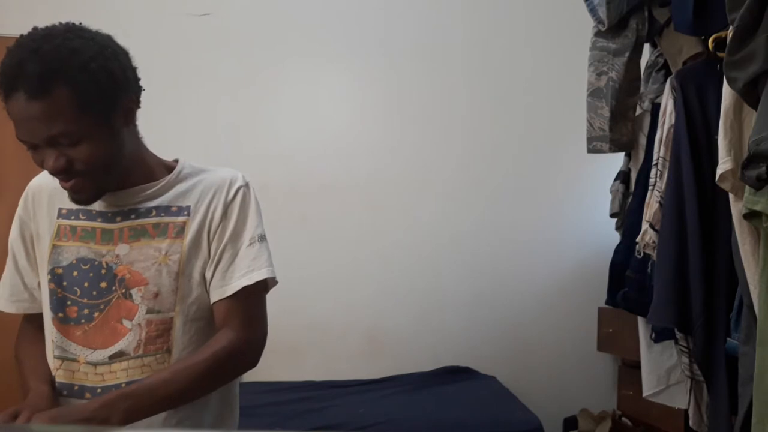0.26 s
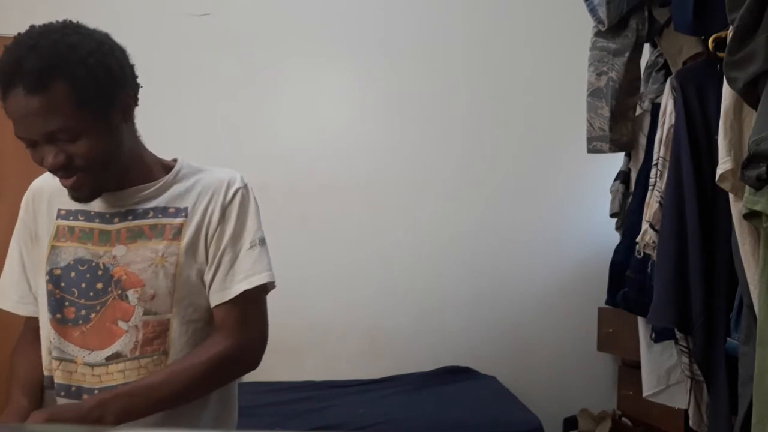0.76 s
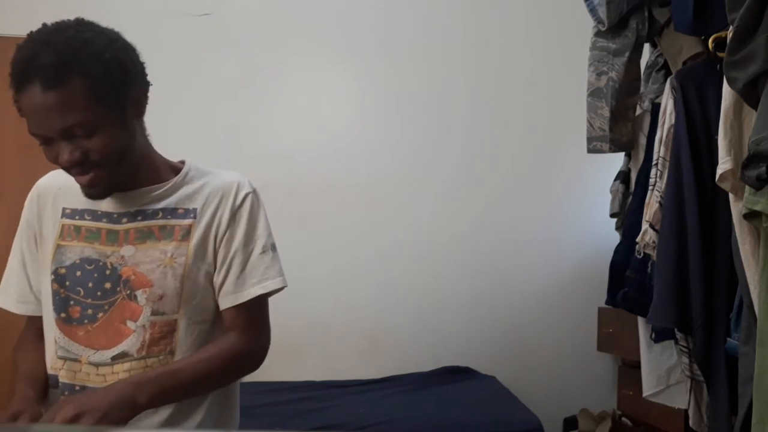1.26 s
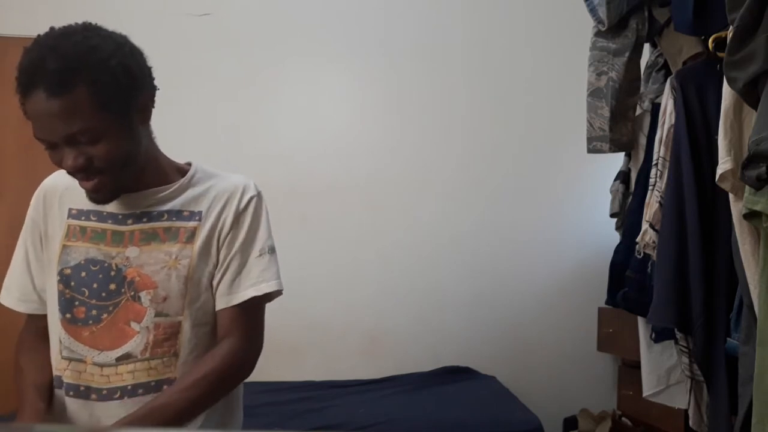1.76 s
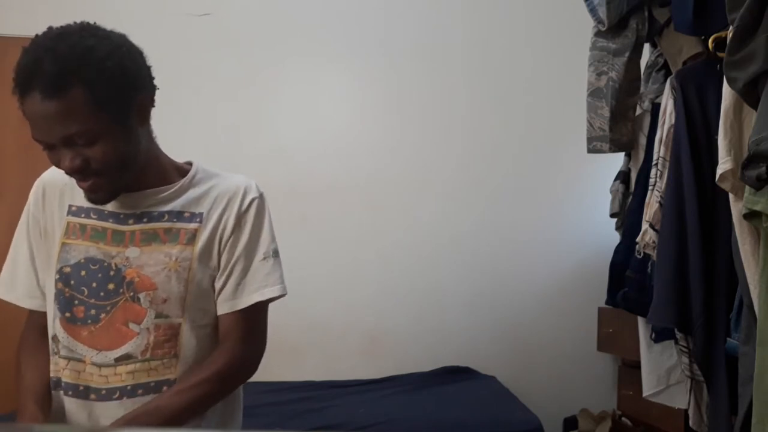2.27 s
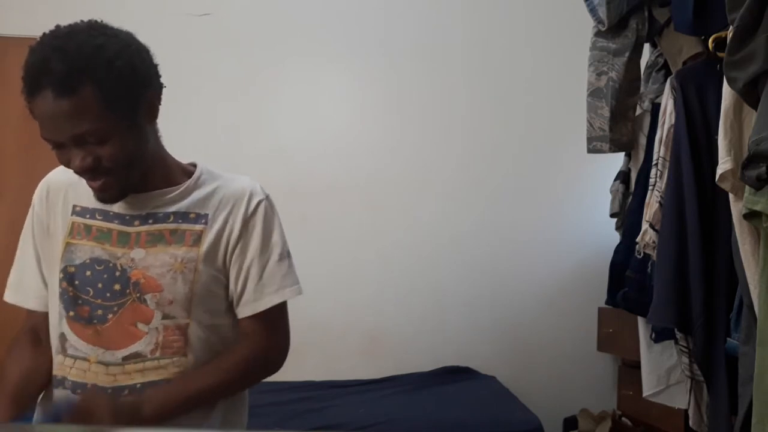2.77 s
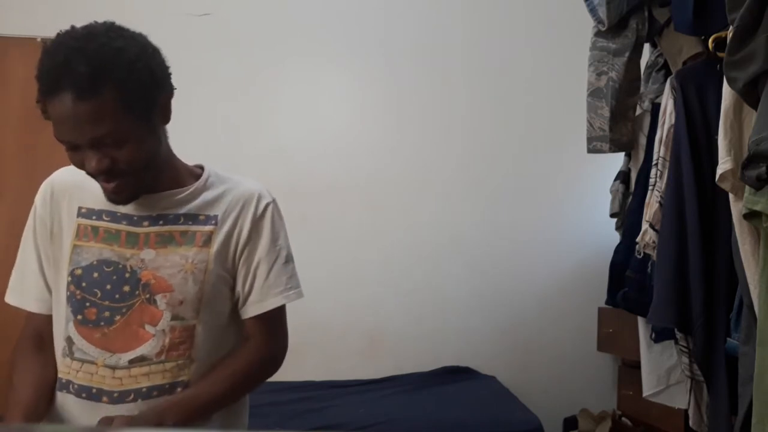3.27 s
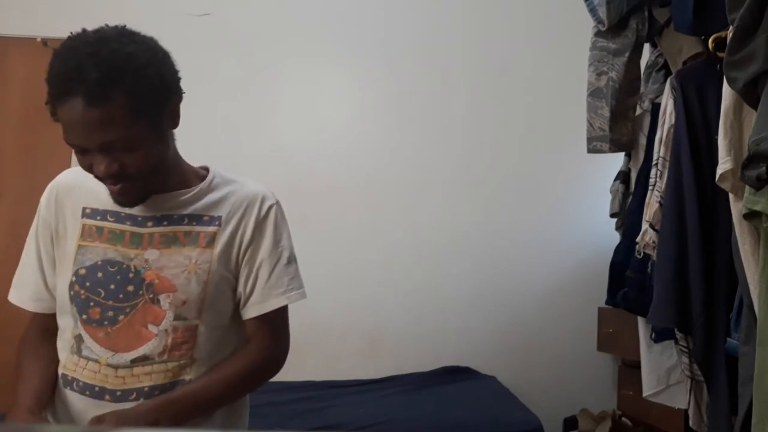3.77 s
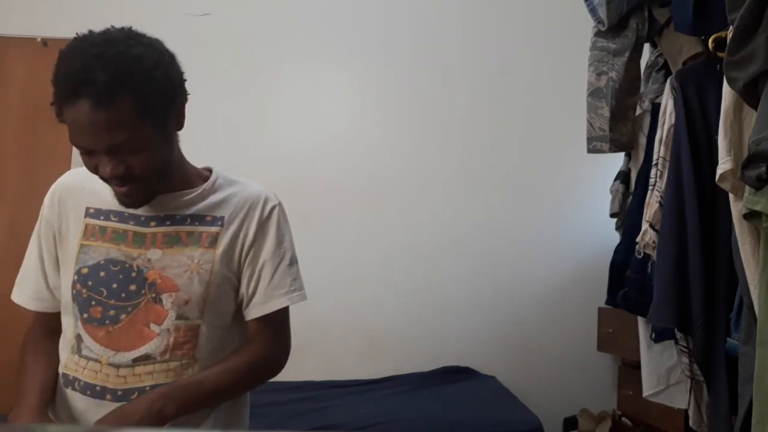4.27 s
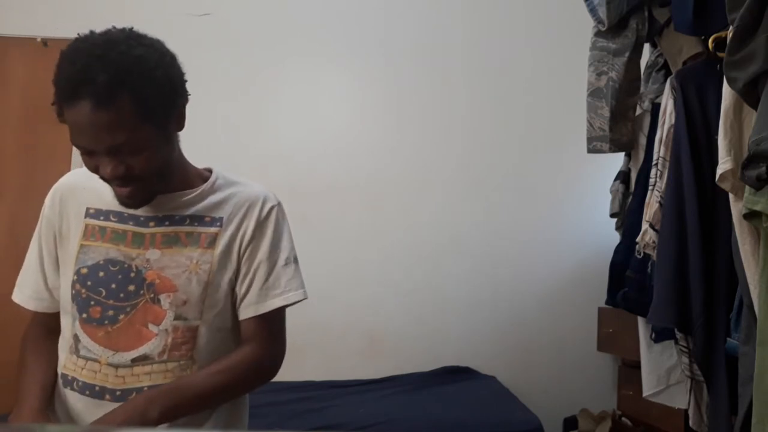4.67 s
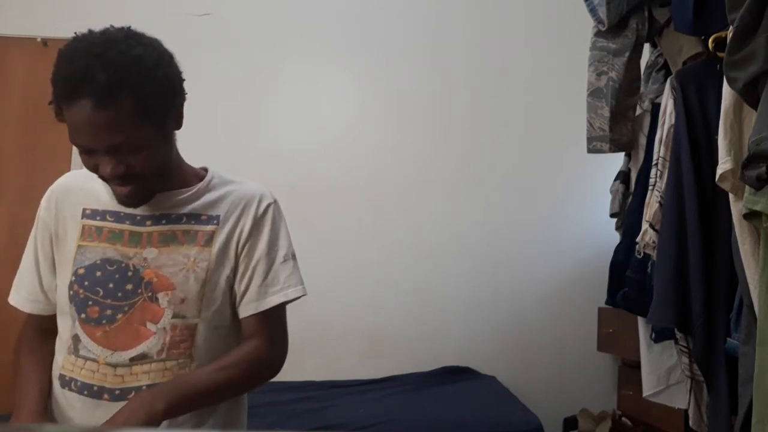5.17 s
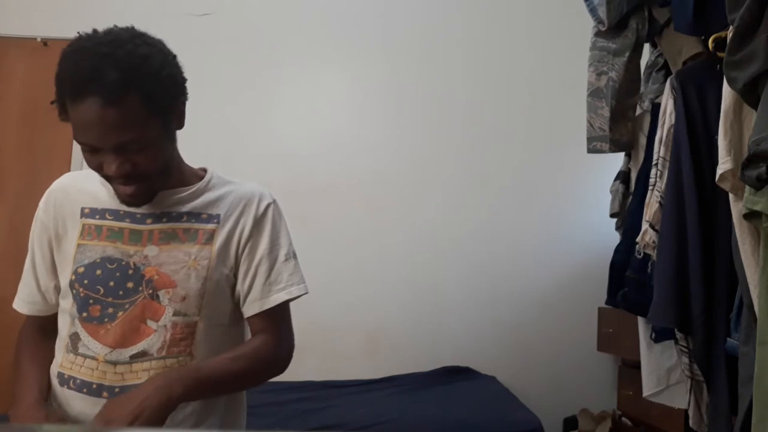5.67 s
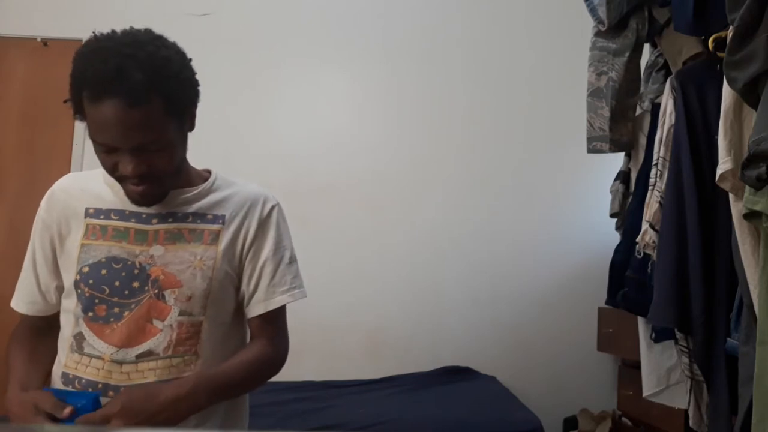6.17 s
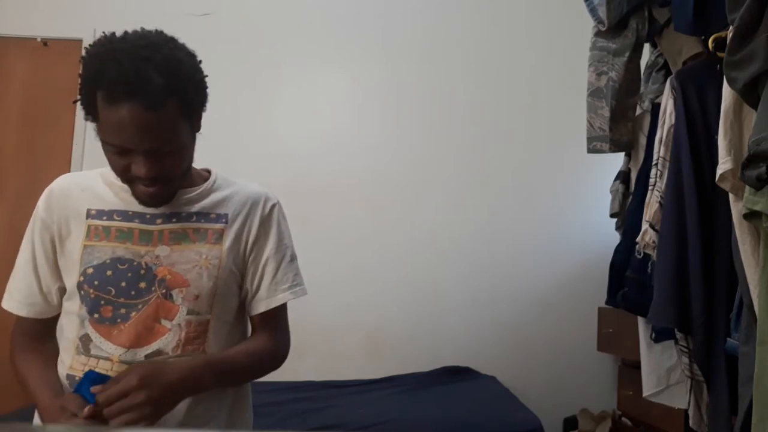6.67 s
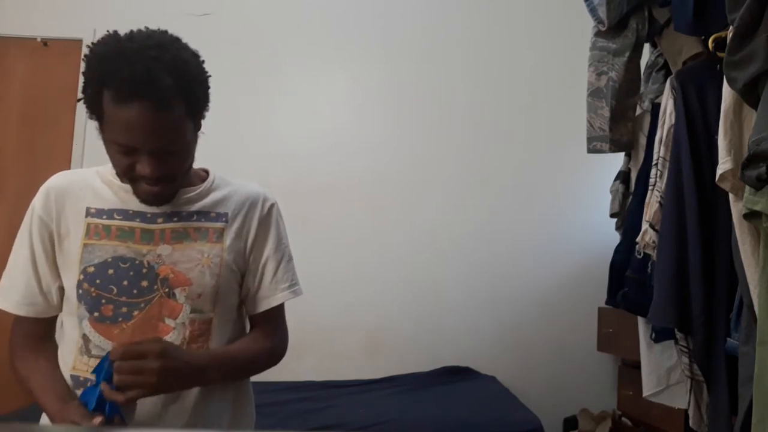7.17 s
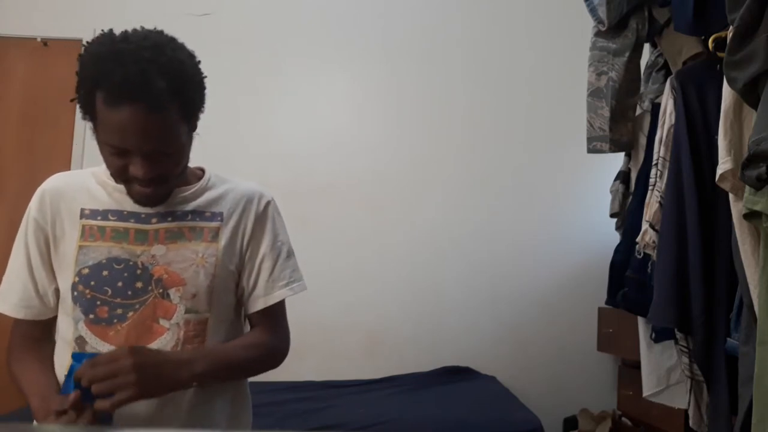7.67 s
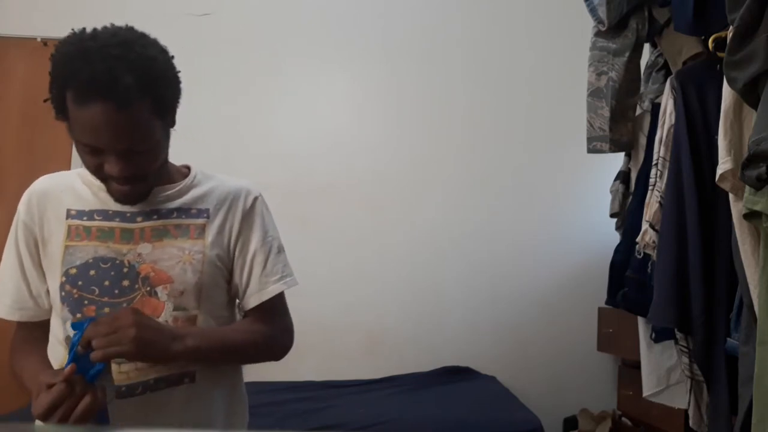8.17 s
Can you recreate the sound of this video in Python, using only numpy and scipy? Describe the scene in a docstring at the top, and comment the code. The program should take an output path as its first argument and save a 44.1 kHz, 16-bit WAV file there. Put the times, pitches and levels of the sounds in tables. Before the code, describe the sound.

A thin plastic wrapper is torn twice and rustles with sharp crackles, while something hard clatters briefly onto a wooden table.

```python
"""Light rustling and ticks of plastic, then a rip: hands open and crinkle a small packet over a table.
The film tears twice, in surges of tiny fractures; it rustles under finger strokes and its creases snap.
Midway something hard is set down, ringing the table. Close perspective, one microphone, a quiet room:
the table top gives the film's clicks a quick echo, the room a short tail; a low hum goes on underneath."""
import sys
import numpy as np
from scipy import signal
from scipy.fft import rfft, irfft
from scipy.io import wavfile
from scipy.ndimage import uniform_filter1d

SR = 44100
rng = np.random.default_rng(int(sys.argv[2]) if len(sys.argv) > 2 else 0)


def to_wav(s):
    """Save 16-bit WAV."""
    ch = np.atleast_2d(s).T  # columns
    pcm = np.round(np.clip(ch, -1, 1) * 32767)  # PCM
    wavfile.write(sys.argv[1], SR, pcm.astype(np.int16))


N = 370881
TIME = np.arange(N) / SR
BODY_HZ, SIZZLE_HZ, TOP_HZ = 1100, 5500, 16000  # crackle lies between body and sizzle

# Levels in the tables are relative; each source sets its own gain.
# room tone: f/Hz, level/dB
AIR_SPECTRUM = [(15, -42.5), (25, -9.5), (102, 4), (134, -4), (190, -15.5), (451, -18.5), (531, -24),
                (840, -22.5), (1020, -30), (1290, -27.5), (2760, -20.5), (2990, -13), (3920, -21),
                (13600, -32.5), (16000, -36)]
# knocks on the table: t/s, thud/dB, clack/dB
TABLE_KNOCKS = [(1.947, -48, -45), (2.144, -42, -55), (2.74, -33, -46), (2.847, -34, -39),
                (3.095, -42, -29.5), (3.112, -35, -29.5), (3.315, -45, -47), (3.343, -42, -45.5),
                (3.388, -27, -38), (3.4424, -30.5, -31), (3.5004, -31, -33), (3.6837, -23, -32),
                (3.701, -26, -32.5), (3.732, -30, -33), (3.743, -20.5, -32.5), (3.768, -31.5, -41),
                (3.817, -35.5, -46), (5.545, -40.5, -43)]
# modes of the table: f/Hz, level/dB, t60/s
TABLE_MODES = [(186.2, 9, 0.23), (224, 8.5, 0.16), (272.5, -2.5, 0.17), (329.6, -4.5, 0.21),
               (352, -6, 0.084), (462, -5, 0.2), (514, -17, 0.44), (607, -10, 0.12), (835, -39, .16)]
# hard contact on wood: f/Hz, level/dB
CLACK_SPECTRUM = [(240, -42), (400, -6.5), (485, 0.5), (673, -5.5), (829, -1.5), (1040, -8.5), (1500, -5),
                  (2120, -9), (3070, -4.5), (6460, -19.5), (7840, -19.5), (14000, -29)]
# its resonances: f/Hz, width/Hz, lift/dB
CLACK_RESONANCES = [(1315, 17, 3.5), (1490, 48, 1.4), (1820, 240, 4.3), (3020, 170, 2.7), (4250, 230, 7.8)]
# fingers rubbing the hollow packet, things sliding on the table: t/s, level/dB, f/Hz, half-length/s
RUB_SWELLS = [(1.66, -76, 1860, 0.13), (1.885, -48.5, 3250, 0.027), (1.938, -35.5, 3280, 0.0079),
              (2.252, -53, 600, 0.1), (2.598, -54, 464, 0.025), (2.657, -46, 436, 0.048),
              (3.13, -47, 1880, 0.026), (3.135, -47, 2920, 0.027), (3.2, -57, 5470, 0.16),
              (3.2, -62.5, 8600, 0.18), (3.21, -53, 690, 0.083), (3.215, -48, 2610, 0.1),
              (3.215, -49, 1850, 0.089), (3.332, -50.5, 1350, 0.058), (3.331, -47.5, 2820, 0.038),
              (3.47, -45.5, 1400, 0.062), (4.852, -64.5, 1300, 0.043), (5.551, -43, 376, 0.014),
              (5.801, -64, 830, 0.058), (5.918, -50, 1510, 0.072), (6.622, -55, 1270, 0.04),
              (6.815, -53.5, 715, 0.032), (7.015, -42, 820, 0.024), (7.133, -51.5, 805, 0.013),
              (7.323, -52, 790, 0.013), (7.78, -74, 1960, 0.1), (7.914, -49.5, 880, 0.023),
              (7.936, -43, 1230, .014), (8.088, -42.5, 1190, 0.038), (8.3, -70.5, 1350, 0.14),
              (8.36, -56.5, 438, 0.056)]
# the packet whispers in the hands: from/s, to/s (a reversed span is silent)
HELD_SPANS = [(0, 0.35), (.68, 0.76), (1.122, 1.44), (1.56, 2.95), (3.92, 4), (4.68, 4.75), (4.97, 5),
              (5.14, 6.18), (6.27, 6.3), (7.18, 8.3), (8.28, 7.2)]
# finger strokes at their firmest: t/s, length/s, level/dB, body offset/dB, sizzle offset/dB
FINGER_STROKES = [(0.022, 0.044, -53.5, -16, -15), (0.177, .11, -50.5, -9.5, -7),
                  (0.244, 0.088, -43, -11.5, -4.5), (0.796, 0.29, -55, -20, -19),
                  (0.993, 0.064, -50, -26, -9.5), (1.251, 0.12, -47.5, -12.5, 0.5),
                  (1.367, 0.087, -55.5, -17, 2), (1.598, 0.14, -59, -10, -28),
                  (1.704, 0.22, -64.5, -19, -6), (1.974, 0.097, -50.5, -1.5, 1),
                  (2.174, 0.075, -43, -3.5, -1.5), (2.245, 0.12, -41, -5, -1.5),
                  (2.387, .15, -53.5, -23, -4.5), (2.473, 0.086, -52, -13.5, -1),
                  (2.586, 0.056, -49.5, -16, -3), (2.665, 0.12, -44.5, -7, -0.5),
                  (2.855, 0.096, -47.5, 4.5, 3.5), (2.921, 0.086, -50.5, -2.5, 0.5),
                  (3.989, 0.23, -58, -33, -27), (4.259, 0.11, -55, -21, -6.5), (4.8, 0.33, -66.5, -7, -11),
                  (5.023, 0.07, -72.5, -10, -5), (5.167, 0.069, -57.5, -13, -11),
                  (5.303, 0.15, -68, -19, -8), (5.415, 0.15, -53, -16.5, 0.5), (5.571, 0.078, -59, 0, 9),
                  (5.652, 0.082, -50, -18, -1), (5.774, 0.27, -54.5, -13, -6),
                  (5.907, 0.074, -47, -15.5, -5), (6.079, 0.21, -53, -20.5, -4), (6.32, 0.17, -65, -7, 0),
                  (6.471, 0.091, -52.5, -16.5, -5), (6.653, 0.11, -52.5, -15, 0),
                  (6.728, 0.053, -52, -10.5, -3), (6.82, 0.094, -56, 2, 3), (6.929, 0.15, -47.5, -9.5, 2.5),
                  (7.009, 0.044, -40, -7, 1.5), (7.343, .14, -58, -8, 3), (7.552, 0.2, -69, -7, 6.5),
                  (7.755, 0.23, -63, -6, 4), (7.925, 0.15, -59.5, -13, 5), (8.101, 0.071, -54.5, -1, 2)]
# the plastic film: f/Hz, level/dB
FILM_SPECTRUM = [(120, -31.5), (200, -26.5), (322, -22), (465, -11.5), (659, -18.5), (836, -7.5),
                 (1020, -14), (1270, -6), (2750, 1), (3020, 2), (3970, -1.5), (5800, -3.5), (7000, -8.5),
                 (9400, -7), (11700, -11), (16000, -27.5)]
# creases snapping over: t/s, level/dB, body offset/dB, sizzle offset/dB, ring f/Hz
CREASE_SNAPS = [(0.0722, -34, -15, -26, 3120), (0.1246, -32, -19, -29, 2950),
                (0.1496, -33.5, -24, -30, 3060), (0.2307, -29, -8, -26, 3140),
                (0.4092, -28, -27, -23, 3400), (0.9523, -40, -24, -28, 2300),
                (0.9702, -31.5, -26, -23, 3500), (1.1047, -34.5, -41, -4.5, 2140),
                (1.1593, -37.5, -26, -7.5, 2000), (1.1927, -38, -27, -5, 2340), (1.22, -33.5, -21, 1, 5270),
                (1.724, -41, -19, -9, 4000), (1.8643, -39, -36, -16, 3400), (1.8981, -40, -19, 3, 4870),
                (1.9441, -21.5, -14, -6, 2940), (1.9948, -33.5, -25, -11, 4400),
                (2.069, -33.5, -13.5, -7.5, 4250), (2.1406, -20, -14.5, -13, 2500),
                (2.2039, -20.5, -13, -10, 3070), (2.2189, -28.5, -20, 3.5, 3440),
                (2.2694, -31.5, -1, 1, 2980), (2.455, -29.5, -43, -14.5, 5000),
                (2.567, -42.5, -14, 3.5, 3040), (2.6281, -23.5, -13.5, -4, 2900),
                (2.8625, -17.5, -24, -16, 3330), (3.998, -38, -18, -19.5, 4200),
                (5.016, -45, -24.5, -6.5, 3600), (5.061, -51.5, -5, -7, 2500), (5.132, -48, -7, -20, 1680),
                (5.3686, -37.5, -40, -3, 4600), (5.5414, -20, -27, -8, 3380),
                (5.7168, -30, -20, -12.5, 2700), (5.8523, -35, -35, -18, 4230),
                (5.9444, -28.5, -25, -15.5, 2800), (6.0143, -35, -17, -7, 3700),
                (6.2672, -26.5, -42, -17.5, 3850), (6.3047, -33.5, -23, -10, 3420),
                (6.4489, -32.5, -38, -18, 3940), (6.605, -33, -22, -6, 2610), (6.7148, -30, -36, -14, 3330),
                (6.7384, -28, -21, -6.5, 3520), (6.7993, -28, -37, -0.5, 4500),
                (6.9652, -33, -11, 4.5, 3280), (6.988, -31.5, -17, 4, 2600), (7.1459, -39, -18, -12, 3300),
                (7.1764, -28, -15.5, -8, 2240), (7.3196, -33, -15, -19, 3680), (7.4125, -40, -42, 1, 5000),
                (7.7099, -40.5, -28, -25, 3400), (7.744, -44, -5.5, -4.5, 3400),
                (7.9053, -33, -8, -8, 1770), (7.9278, -31, -1.5, -28, 1290), (8.0309, -39, -3.5, -4, 1260),
                (8.0798, -22.5, -11.5, -2, 1600), (8.336, -43, -2.5, -11.5, 1300)]
# upper ring of a facet, lower in the thin snap of a tight crease: body offset/dB, f/Hz
UPPER_RING = [(-36, 7600), (-18.5, 8700)]
# surges of each rip: t/s, run/s, mid-run level/dB, swell over the run/dB
FIRST_SURGES = [(.432, 0.0023, -34.5, -1), (.4425, 0.045, -24, 12), (.496, 0.0049, -13.5, 2),
                (.504, 0.023, -31.5, -18)]
SECOND_SURGES = [(2.683, 0.007, -31.5, 12), (2.690, 0.0023, -20, -6), (2.733, 0.025, -23, -5.5)]
# tone of each rip: f/Hz, level/dB
FIRST_SPECTRUM = [(88, -44.5), (150, -19), (297, -23), (400, -13.5), (457, -6.5), (504, -9.5), (923, -5.5),
                  (998, -17), (1080, -5), (1660, -14.5), (1980, -5.5), (2810, -10.5), (3040, -8.5),
                  (4580, -17), (10600, -17), (16000, -36)]
SECOND_SPECTRUM = [(35, -42), (70, -13), (130, -13.5), (222, -16.5), (338, -14.5), (822, -8.5),
                   (1250, -13.5), (1550, -6), (1950, -4.5), (3670, -13), (5460, -11.5), (6140, -14.5),
                   (13000, -17), (16000, -30)]
# ringing peaks in the first rip's tone: f/Hz, width/Hz, lift/dB
FIRST_RIP_PEAKS = [(1140, 35, 0), (1430, 42, 7), (1956, 25, 6.5), (2360, 60, 2), (2500, 52, 5.5),
                   (3070, 170, 7.5), (3440, 59, 4.5)]


def undb(db):
    """Decibels to gain."""
    return 10 ** (np.asarray(db) / 20)


def unit(x):
    """Scale to rms 1."""
    return x / np.sqrt(np.mean(x ** 2))


def add(track, s, sound):
    """Mix a sound in at s seconds."""
    start = int(s * SR)
    track[start:start + len(sound)] += sound[:N - start]


def cut(x, hz, kind, order=2):
    """Butterworth low-, high- or band-pass."""
    return signal.sosfilt(signal.butter(order, hz, kind, fs=SR, output="sos"), x)


def through(x, response):
    """Pass a sound through an impulse response."""
    return signal.fftconvolve(x, response)[:len(x)]


def colour(spectrum, resonances=(), size=4096):
    """Minimum-phase response of a smooth spectrum with resonances on top."""
    hz = np.maximum(np.fft.rfftfreq(size, 1 / SR), 1)
    point_hz, point_db = np.transpose(spectrum)
    db = np.interp(np.log(hz), np.log(point_hz), point_db)
    for centre, width, lift in resonances:
        db += lift / (1 + (2 * (hz - centre) / width) ** 2)
    cepstrum = irfft(np.log(undb(db)))
    cepstrum[1:size // 2] *= 2
    cepstrum[size // 2 + 1:] = 0
    return irfft(np.exp(rfft(cepstrum)))


def registers(x):
    """Split a sound into body, crackle and sizzle."""
    return (cut(x, BODY_HZ, "low", order=5),
            cut(x, [BODY_HZ, SIZZLE_HZ], "band", order=5),
            cut(x, SIZZLE_HZ, "high", order=5))


def fade(t60, size):
    """Exponential decay, 60 dB down after t60 seconds."""
    return undb(-60 * np.arange(size) / SR / t60)


def wander(rate_hz):
    """Slow random drift of rms 1."""
    hold = int(SR / rate_hz)
    steps = np.repeat(rng.standard_normal(N // hold + 1), hold)
    return unit(uniform_filter1d(steps, hold)[:N])


def fractures(per_s, spread_db, t60, steady_s):
    """Tiny clicks of very unequal size; each comes from another facet, so no two ring alike."""
    breaks = rng.random(N) < per_s / SR
    sizes = undb(spread_db * np.minimum(rng.exponential(size=N), 5))
    clicks = unit(through(breaks * sizes, fade(t60, 512)) * rng.standard_normal(N))
    # the hands feed in energy steadily, however it is shared among the clicks
    power = uniform_filter1d(clicks ** 2, int(steady_s * SR))
    return clicks / np.sqrt(np.abs(power) + .01)


def room_tone(air_db=-65, hum_db=-68.5, hum_hz=90.2, waver_db=3, drift=.015):
    """Faint air and a low hum that wavers in pitch and level."""
    air = unit(through(rng.standard_normal(N), colour(AIR_SPECTRUM)))
    air = cut(air, 38, "high", order=4)
    pitch_hz = hum_hz * (1 + drift * wander(21))
    hum = unit(np.sin(2 * np.pi * np.cumsum(pitch_hz) / SR))
    return undb(air_db) * air + undb(hum_db + waver_db * np.tanh(wander(6))) * hum


def room(x, wet_db, band_t60s=(.25, .25, .22), build_s=.0031, spots=7, size=16000):
    """A small furnished room; diffuse tails take turns, as the echoes change when the hands move."""
    spot = np.arange(N) // 900 % spots
    build = 1 - np.exp(-(np.arange(size) / SR / build_s) ** 2)
    wet = 0
    for k in range(spots):
        bands = registers(rng.standard_normal(size))
        tail = build * sum(band * fade(t60, size) for band, t60 in zip(bands, band_t60s))
        share = np.sqrt(np.abs(uniform_filter1d(1. * (spot == k), size=400)))
        wet += through(x * share, tail / np.linalg.norm(tail))
    return x + undb(wet_db) * wet


def table_echo(x, echo_db, lag_s=.0024, sway=.1, above_hz=900):
    """The table top throws treble back to the microphone; the lag drifts as the hands rise and dip."""
    delay_s = lag_s * (1 + sway * wander(6))
    echo = np.interp(TIME - delay_s, TIME, cut(x, above_hz, "high"), left=0)
    return x + undb(echo_db) * echo


def knocks(clack_db=4, clack_t60=.19, crack_t60=.01, uneven_db=.5, size=20000):
    """Each knock rings the low modes of the table; hard contact adds a crack and a woody clack."""
    out, t = np.zeros(N), np.arange(size) / SR
    modes = np.array([undb(db) * np.sin(2 * np.pi * hz * t) * fade(t60, size)
                      for hz, db, t60 in TABLE_MODES])
    contact = colour(CLACK_SPECTRUM, CLACK_RESONANCES)
    decay = fade(clack_t60, size) + fade(crack_t60, size)
    for s, thud_db, hard_db in TABLE_KNOCKS:
        thud = undb(-uneven_db * rng.standard_normal(len(modes))) @ modes  # each spot favours other modes
        # a harder contact is shorter, so its clack reaches higher
        edge_hz = min(6000 * 2 ** ((hard_db + 30) / 31.5), TOP_HZ)
        clack = cut(through(rng.standard_normal(size) * decay, contact), edge_hz, "low", order=1)
        add(out, s, undb(thud_db) * thud / np.abs(thud).max())
        add(out, s, undb(hard_db + clack_db) * clack / np.abs(clack).max())
    return cut(out, 140, "high", order=3)  # a board radiates little below its first modes


def rubs(gain_db=-1, band_ratio=1.15):
    """Stick and slip: a swell of dense small catches sounds one broad resonance."""
    catches = fractures(per_s=1900, spread_db=2.5, t60=.0019, steady_s=.0092)
    out = np.zeros(N)
    for s, db, hz, half_s in RUB_SWELLS:
        start = int((s - half_s) * SR)
        rub = cut(catches[start:start + int(2 * half_s * SR)], [hz / band_ratio, hz * band_ratio], "band")
        add(out, s - half_s, undb(db + gain_db) * unit(rub) * np.hanning(len(rub)))
    return out


def handling(whisper_db=-64, waver_db=1.5, whisper_bands_db=(-22, 0, -7), rise_share=.48, ends_db=-11.5):
    """Envelopes of body, crackle and sizzle: strokes swell and ease above the held packet's whisper."""
    held = sum(1. * ((TIME >= start) & (TIME <= end)) for start, end in HELD_SPANS)
    whisper = np.abs(uniform_filter1d(held, size=1500)) * undb(whisper_db + waver_db * wander(9))
    power = np.outer(undb(whisper_bands_db), whisper) ** 2
    for s, length_s, db, body_db, sizzle_db in FINGER_STROKES:
        near = np.abs(TIME - s) < 2 * length_s
        offset = (TIME[near] - s) / length_s
        from_peak = offset / np.where(offset < 0, rise_share, 1 - rise_share)
        swell = undb(db + ends_db * from_peak ** 2)
        power[:, near] += np.outer(undb([body_db, 0, sizzle_db]), swell) ** 2
    return np.sqrt(power)


def rustle(envelopes, bands_db=(1, -2, -2), slide_db=-7, buckle_db=-54):
    """Fingers work the film: it slides under a light touch and crinkles under a firm one."""
    sliding = undb(slide_db) * fractures(per_s=5200, spread_db=3, t60=.0054, steady_s=.0027)
    crinkles = fractures(per_s=500, spread_db=3.5, t60=.005, steady_s=.03)
    effort = envelopes[1] ** 2
    firmness = effort / (effort + undb(buckle_db) ** 2)
    touch = (sliding + np.sqrt(firmness) * crinkles) / np.sqrt(undb(slide_db) ** 2 + firmness)
    bands = registers(through(touch, colour(FILM_SPECTRUM)))
    return sum(undb(db) * envelope * unit(band) for db, envelope, band in zip(bands_db, envelopes, bands))


def lesser_creases(envelopes, count=70, lift_db=14, spread_db=3, ring_hz=3400, spread_oct=.35):
    """Small creases give way at random, as strongly as the film is worked; rows as in CREASE_SNAPS."""
    starts = rng.integers(SR // 10, N, count)
    rows = []
    for start, (size, pitch) in zip(starts, rng.standard_normal((count, 2))):
        db = 20 * np.log10(envelopes[1, start] + 1e-9) + lift_db + spread_db * size
        rows.append((start / SR, db, -20, -9, ring_hz * 2 ** (spread_oct * pitch)))
    return rows


def snaps(creases, gain_db=-21, body_lift_db=4, sizzle_lift_db=6, spread_oct=.13, lead=400, size=2048):
    """A crease creaks, then buckles: a click, a dense flip, a fading scatter, two rings of the facet."""
    out = np.zeros(N)
    creak = .042 * fade(t60=.03, size=lead)[::-1]
    flip = .093 * fade(t60=.01, size=size)
    scatter = .075 * fade(t60=.022, size=size)
    strain = np.concatenate([creak, flip + scatter])
    for s, db, body_db, sizzle_db, hz in creases:
        buckle = strain * rng.standard_normal(len(strain))
        buckle[lead] = 1  # the sharp click
        upper_hz = np.interp(body_db, *np.transpose(UPPER_RING))
        upper_hz *= 2 ** (spread_oct * rng.standard_normal())
        facet = colour(FILM_SPECTRUM, resonances=[(hz, .3 * hz, 7), (upper_hz, .3 * upper_hz, 5)])
        body, crackle, sizzle = map(unit, registers(through(buckle, facet)))
        snap = undb(body_db + body_lift_db) * body + crackle + undb(sizzle_db + sizzle_lift_db) * sizzle
        add(out, s - lead / SR, undb(db + gain_db) * snap)
    return out


def rip(surges, response, per_s, spread_db, low_cut_hz, attack_s=.0011, release_s=.0045):
    """The tear runs through taut film in surges of dense fractures."""
    tear = through(fractures(per_s, spread_db, t60=.0036, steady_s=.0025), response)
    pull = 0
    for s, run_s, db, swell_db in surges:
        progress = np.clip((TIME - s) / run_s, 0, 1)
        before, after = np.maximum(s - TIME, 0), np.maximum(TIME - s - run_s, 0)
        gate = np.exp(-np.minimum(before / attack_s + after / release_s, 20))
        pull = np.maximum(pull, gate * undb(db + swell_db * (progress - .5)))
    return unit(cut(tear, low_cut_hz, "high", order=3)) * pull


def scene(film_db=-2.6, crease_db=-2.5):
    """Packet, table and room tone as they meet at one close microphone."""
    first_rip_tone = colour(FIRST_SPECTRUM, FIRST_RIP_PEAKS)
    first_rip = rip(FIRST_SURGES, first_rip_tone, per_s=2000, spread_db=3.5, low_cut_hz=230)
    second_rip = rip(SECOND_SURGES, colour(SECOND_SPECTRUM), per_s=4000, spread_db=8, low_cut_hz=50)
    envelopes = handling()
    film = first_rip + second_rip + rustle(envelopes) + rubs()
    film = undb(film_db) * room(table_echo(film, echo_db=-7), wet_db=-2.5)
    creases = snaps(CREASE_SNAPS + lesser_creases(envelopes))
    creases = undb(crease_db) * room(table_echo(creases, echo_db=-8), wet_db=-2.5)
    table = room(knocks(), wet_db=-5.5)
    return (film + creases + table + room_tone())[None]


def record(dry):
    """The recorder cuts the top steeply."""
    return signal.sosfilt(signal.ellip(10, .2, 70, TOP_HZ, fs=SR, output="sos"), dry)


dry = scene()
out = record(dry)
to_wav(out)
```